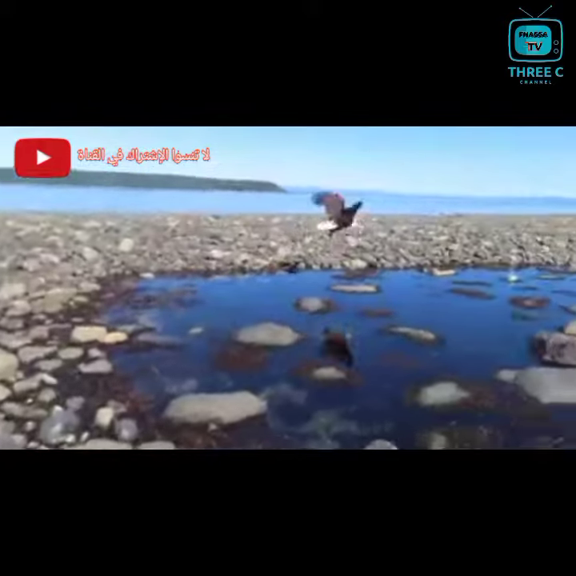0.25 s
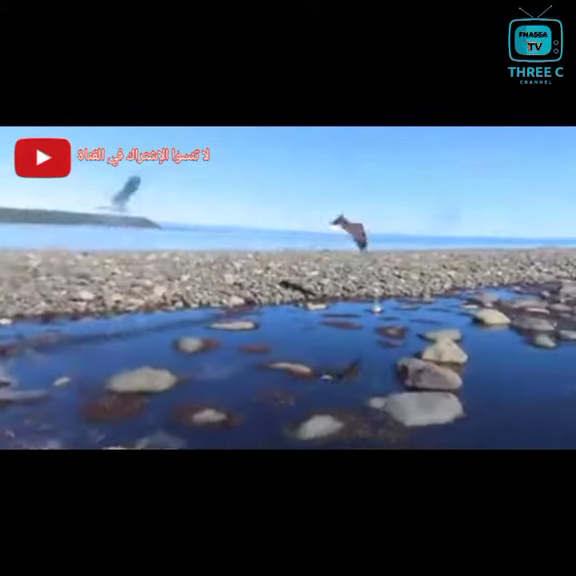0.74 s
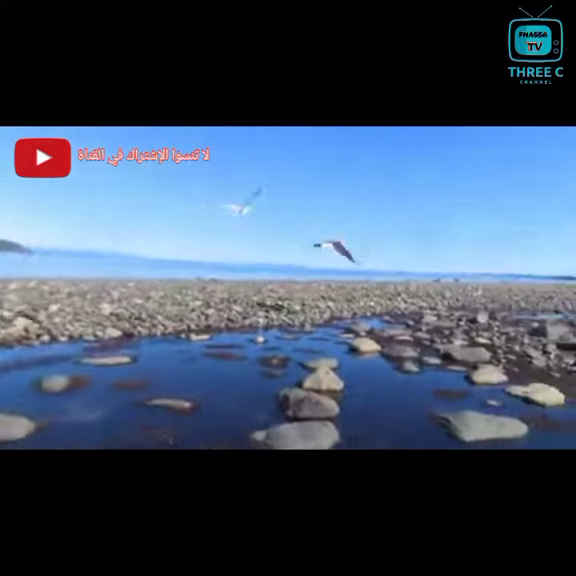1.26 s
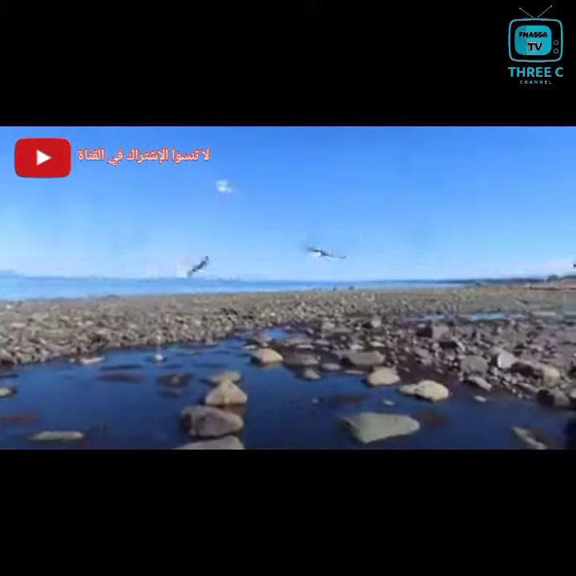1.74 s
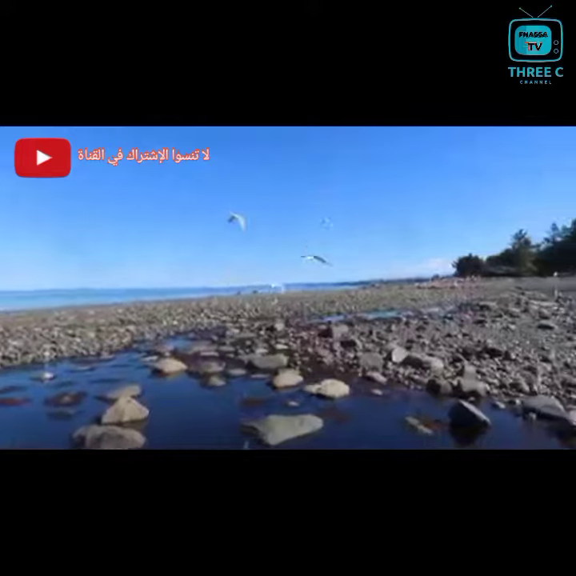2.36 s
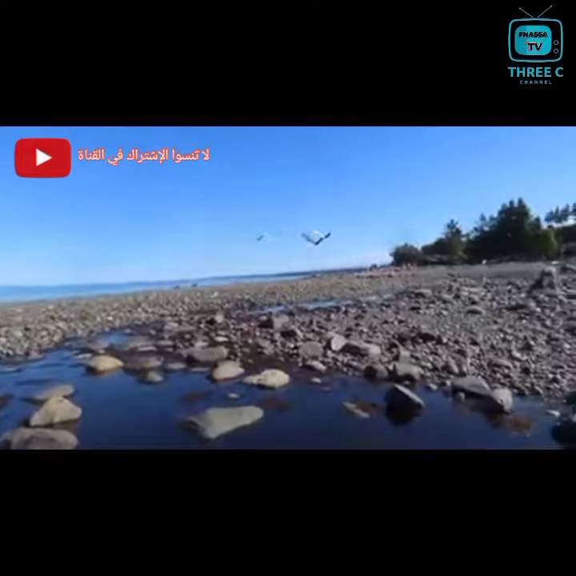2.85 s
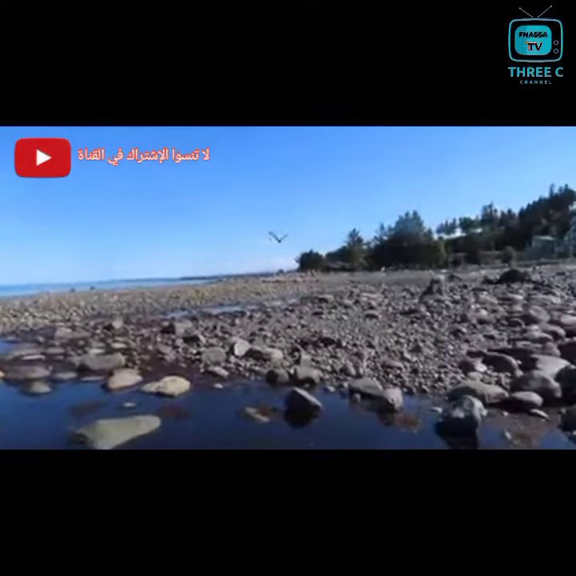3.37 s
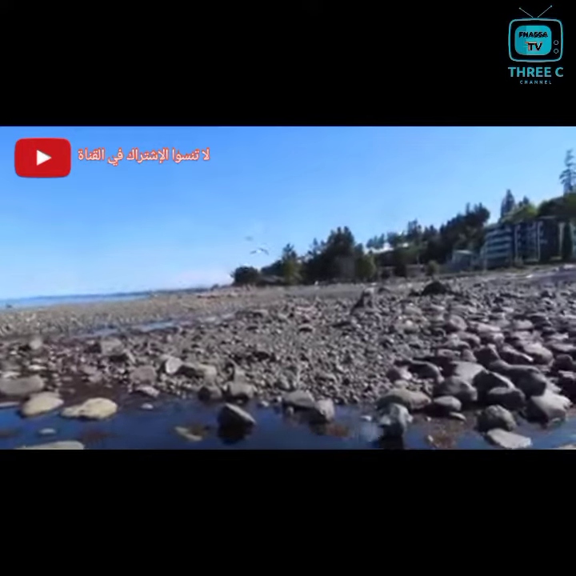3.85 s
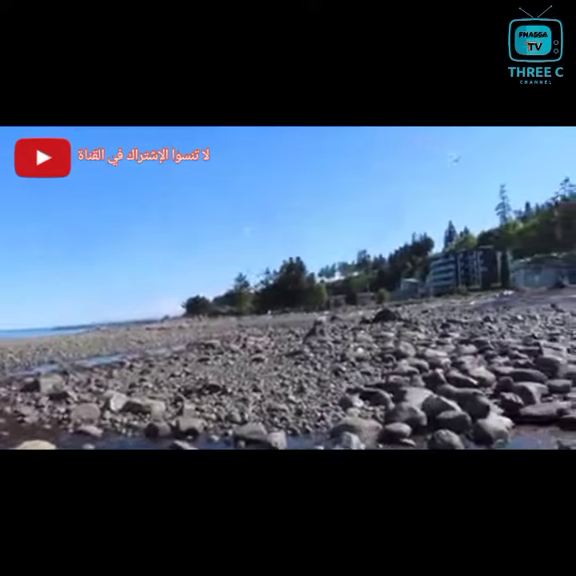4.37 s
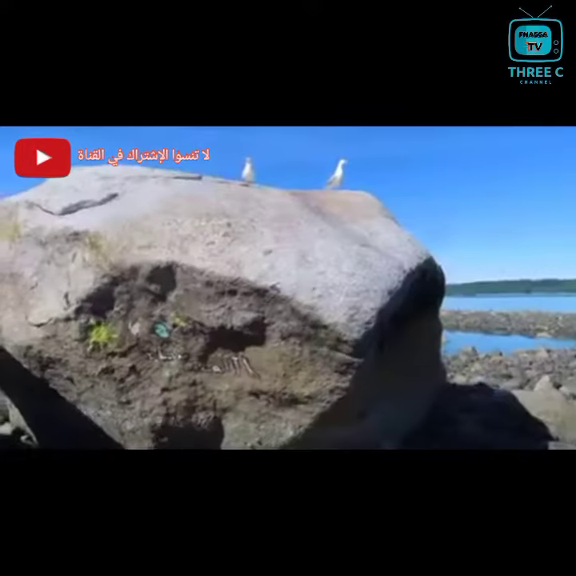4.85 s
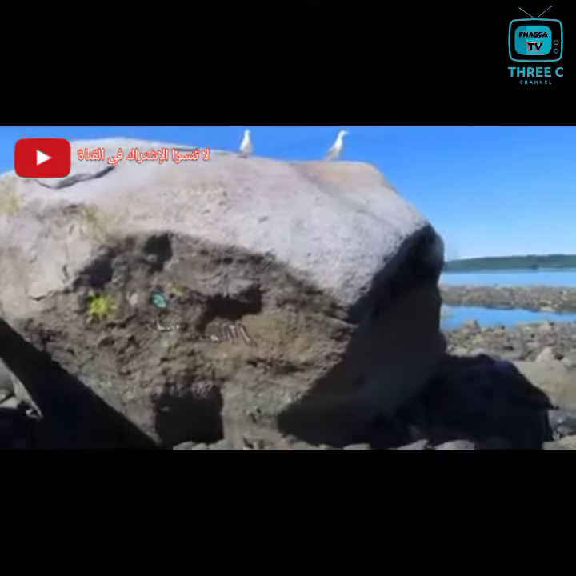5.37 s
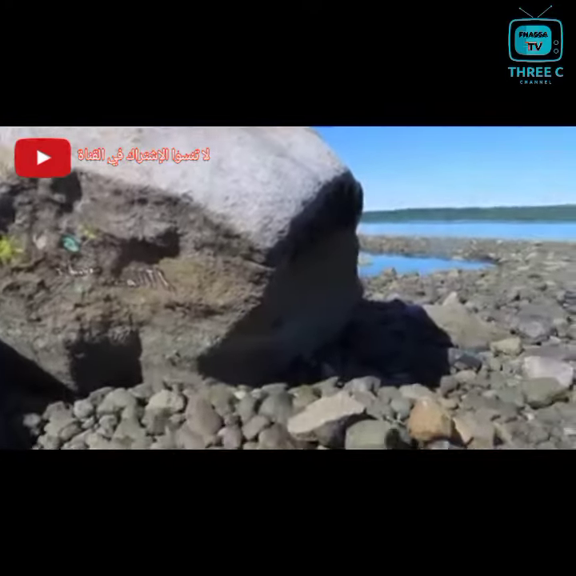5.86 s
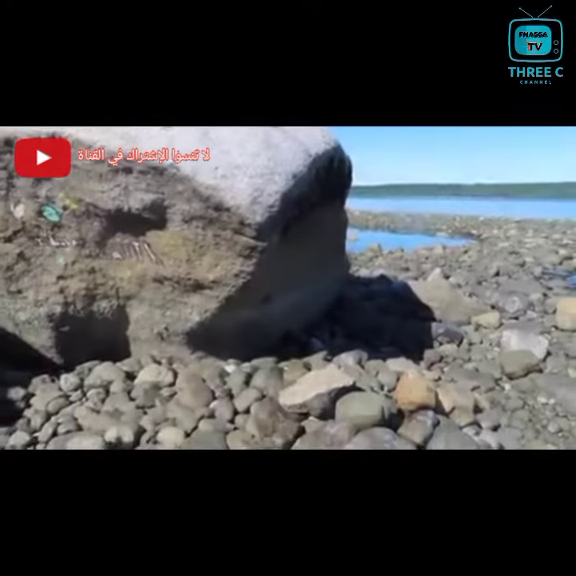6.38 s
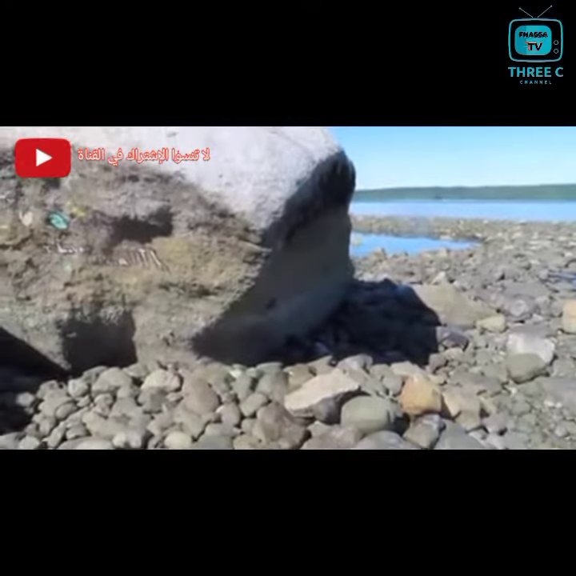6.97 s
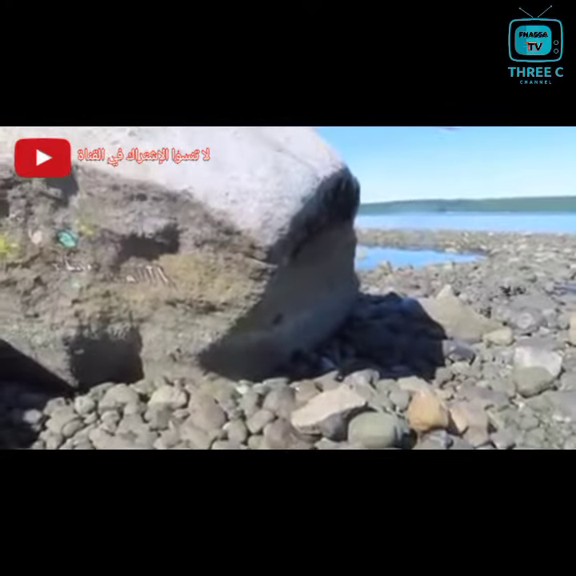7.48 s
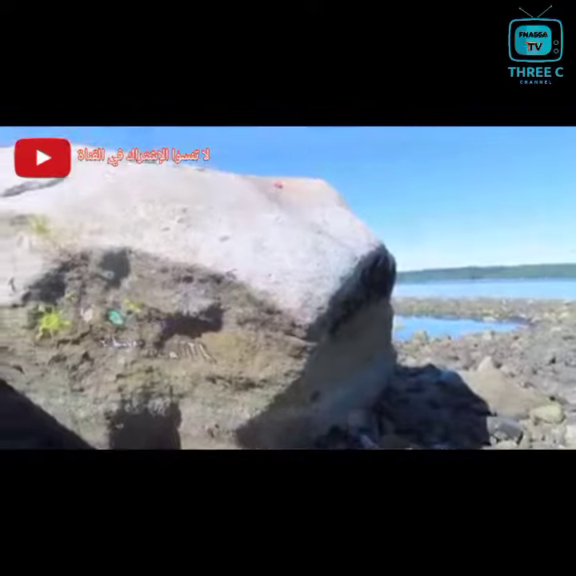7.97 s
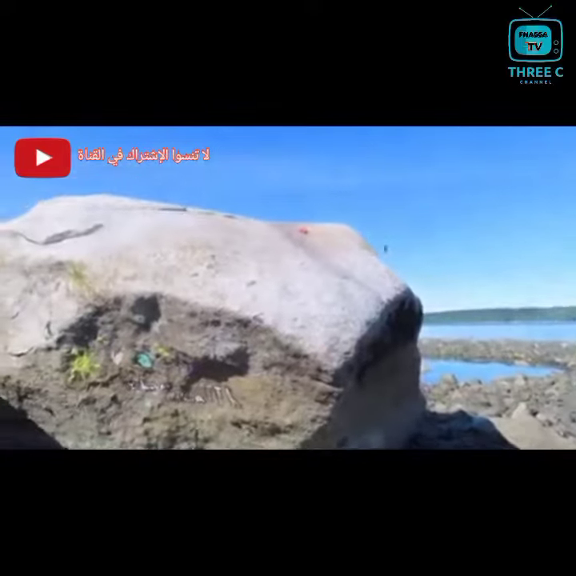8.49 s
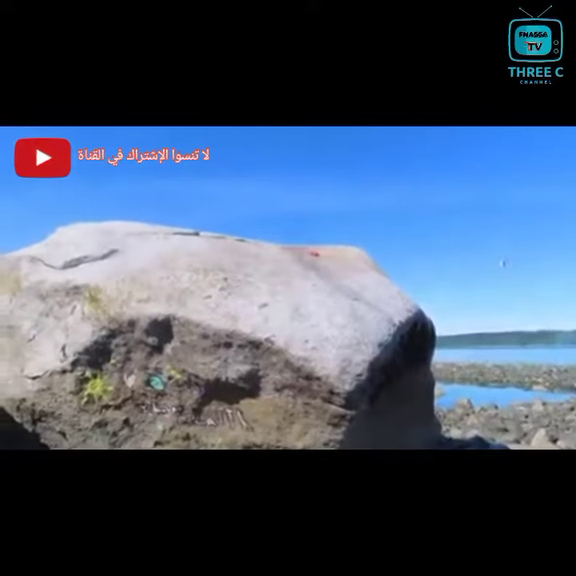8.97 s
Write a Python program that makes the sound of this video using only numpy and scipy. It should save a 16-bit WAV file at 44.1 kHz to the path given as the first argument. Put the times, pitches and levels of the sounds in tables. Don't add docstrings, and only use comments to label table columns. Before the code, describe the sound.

Harsh falling gull cries above soft sea wash and low wind rumble, cut by a short silent gap, then a far engine hum and thumping gusts.

```python
import sys
import numpy as np
from scipy import signal
from scipy.fft import rfft, irfft, next_fast_len
from scipy.io import wavfile
from scipy.ndimage import uniform_filter1d

SR = 44100
rng = np.random.default_rng(int(sys.argv[2]) if len(sys.argv) > 2 else 0)


def file_out(sig):
    cols = np.atleast_2d(sig).T
    lim = np.clip(cols, -1, 1)
    pcm = np.round(lim * 32767).astype(np.int16)
    wavfile.write(sys.argv[1], SR, pcm)


def elevation(decibels):
    levels = np.asarray(decibels, float)
    return 10 ** (levels / 20)


N = 407043
T = np.arange(N) / SR

# start_s, end_s
SHOTS = [
    (0, 4.635),
    (4.823, 8.212),
    (8.213, 9.23),
]

# frequency_hz, density_db
RUMBLE_SPECTRUM = [(20, -24.5), (40, -22), (70, -7), (110, -5.5), (160, -8), (250, -36.5)]
# frequency_hz, density_db
BUFFET_SPECTRUM = [(80, -29), (130, -6), (200, 5.5), (300, -2), (430, -10.5), (600, -23), (900, -40)]
# frequency_hz, density_db
WASH_SPECTRUM = [(240, -45.5), (400, -8), (884, -1), (1090, -3.5), (1190, -4.5), (1280, -3), (1760, -10),
                 (3310, -23.5), (5000, -30.5), (6500, -59), (11000, -120)]
# frequency_hz, density_db
SPRAY_SPECTRUM = [(2060, -17.5), (3500, -2.5), (4450, -11), (6170, -10), (12300, -22.5), (14800, -35.5),
                  (15800, -25)]
# time_s, level_db
SWELL = [
    [(0.0, -42), (0.08, -44.5), (1.45, -38), (1.5, -45.5), (2.84, -30.5), (3.44, -39), (4.04, -30.5),
     (4.62, -37.5)],
    [(4.84, -21), (5.51, -22), (6.8, -21.5), (8.03, -21.5), (8.05, -14), (8.2, -16.5)],
    [(8.23, -30.5), (9.21, -29.5), (9.23, -41)],
]
# time_s, level_db
WIND = [
    [(0, -45), (1.1, -39), (1.6, -48), (2.4, -48.5), (2.6, -28.5), (3.65, -30), (3.8, -38), (4.62, -42.5)],
    [(4.84, -26.5), (5.5, -34.5), (7.6, -36), (7.77, -29.5), (7.95, -35), (8.2, -22.5)],
    [(8.23, -32), (8.6, -38), (8.85, -20), (9.23, -23.5)],
]
# start_s, end_s, side_over_mid
WIDE_SPANS = [(2.5, 3.251, 0.18), (3.397, 3.548, 0.046), (3.952, 4.019, .12), (4.397, 4.55, 0.091),
              (4.812, 5.301, 0.22), (5.601, 5.891, 0.25), (6.2, 6.35, 0.11), (6.599, 6.899, 0.24),
              (7.047, 7.197, 0.17), (7.549, 8.248, 0.6), (8.69, 9.23, 0.2)]
# centre_s, spray_rise_db, half_length_s
WAVES = [
    (0, 17, 0.25),
    (0.332, 11.5, 0.074),
    (0.568, 13, 0.112),
    (2.88, 9, 0.16),
    (6.0, 9.5, 0.12),
    (7.357, 2, 0.15),
]
# start_s, end_s
WHINE_SPANS = [
    (4.8, 6.1),
    (8.7, 9.23),
]

# multiple, level_db
ENGINE_LINES = [(3, -34.5), (4, -26.5), (5, -21.5), (6, -50), (7, -25.5), (8, -39), (9, -33.5), (10, -41.5)]
# time_s, level_db
ENGINE_SWELL = [(4.82, -11.5), (5.6, -14), (6.5, -4.5), (7.5, 1.5), (7.8, -3), (8.2, -18.5)]

# start_s, level_db, pitch_hz
THUMPS = [(2.66, -16, 250), (2.8, -6, 154), (3.426, -10, 218), (3.614, -16, 151), (7.629, -25, 80.5),
          (7.767, -10.5, 104), (8.046, -6.5, 95.4), (8.149, -5, 79.5), (8.701, -3.5, 220)]
# start_s, level_db, pitch_hz, decay_s
PEBBLES = [(0.051, -19, 1760, 0.011), (0.422, -32.5, 2310, 0.014), (0.97, -36, 4550, 0.013),
           (4.619, -32.5, 1640, 0.014), (6.081, -42, 4860, 0.019), (6.7937, -19.5, 2190, 0.0027),
           (6.799, -27.5, 8100, 0.0031), (7.058, -46, 3970, 0.0018)]

# frequency_hz, level_db
THROAT = [(2500, 16.5), (4000, -6), (5500, -14.5), (7000, -20), (8500, -27.5), (11000, -34.5), (13000, -36),
          (16000, -50.5)]
# start_s, length_s, top_pitch_hz, end_pitch_hz, level_db
OPENINGS = [(.66, 0.083, 1385, 1413, -12.5), (2.17, 0.15, 1292, 1317, -14.5),
            (3.0, 0.053, 1090, 1110, -29.5), (3.16, .12, 1265, 1360, -24.5),
            (3.73, 0.045, 1110, 1125, -33.5), (5.255, .1, 1085, 1140, -17), (8.195, 0.11, 1305, 1315, -23),
            (8.872, 0.095, 1455, 1370, -21.5)]
# start_s, length_s, top_pitch_hz, end_pitch_hz, level_db
YELPS = [
    (6.255, .225, 1146, 800, -13),
]
# start_s, length_s, top_pitch_hz, end_pitch_hz, level_db
SHRIEKS = [
    (1.335, 0.28, 1301, 936, -12),
]
# start_s, length_s, top_pitch_hz, end_pitch_hz, level_db
WAILS = [(.7, 0.2, 1606, 1322, -15), (.965, 0.054, 1690, 1560, -25), (2.295, 0.21, 1589, 1305, -21),
         (3.265, 0.11, 1535, 1413, -23), (3.49, 0.095, 1548, 1434, -36.5), (3.762, .203, 1562, 1280, -26.5),
         (5.345, 0.1002, 1339, 1028, -16), (8.95, 0.14, 1598, 1350, -23)]
# start_s, length_s, top_pitch_hz, end_pitch_hz, level_db
DROOPS = [
    (-.085, .2, 1338, 940, -21.5),
    (1.035, .21, 1470, 1000, -25.5),
    (3.052, 0.23, 1530, 1210, -25.5),
]
# start_s, length_s, top_pitch_hz, end_pitch_hz, level_db
TAILS = [(.862, 0.077, 1277, 983, -18.5), (2.29, 0.12, 1480, 1300, -24.5), (2.369, 0.06, 1163, 927, -29),
         (3.33, 0.12, 1332, 967, -28), (3.575, .11, 1324, 1094, -34.5), (4.1, 0.079, 1290, 1170, -34),
         (4.155, 0.1, 1088, 1005, -37.5), (.1, .045, 1048, 986, -29.5), (8.285, 0.13, 1352, 877, -25.5),
         (9.07, 0.057, 1015, 1028, -33.5)]
# start_s, length_s, top_pitch_hz, end_pitch_hz, level_db
ARCHES = [
    (4.735, 0.2, 1088, 809, -16),
    (5.29, .23, 1106, 787, -15.5),
]
# notes, settings of cry(). Pitch starts a share (scoop) under the top,
# closes in over scoop_s and falls from top_share of the note on.
VOICES = [
    (OPENINGS, dict(attack_s=0.055, release_s=0.019, slope_db=3, top_share=0.084, scoop=.13, scoop_s=.018, scoop_bend=1.1, bend=1.1, half_db=3, half_s=0.052, hoarse_db=1, second_db=-7, dull_db=-4.5, third_db=-5, fall_db=-13.5)),
    (SHRIEKS, dict(attack_s=0.06, release_s=0.12, slope_db=0.5, top_share=0.45, scoop=-.145, scoop_s=.058, scoop_bend=3, bend=1.4, half_db=0, half_s=0.053, hoarse_db=3, second_db=-3, dull_db=-17, third_db=-7, fall_db=-10.5)),
    (WAILS, dict(attack_s=0.0091, release_s=0.053, slope_db=2, top_share=.01, scoop=-0.018, scoop_s=0.0093, scoop_bend=1.1, bend=1.3, half_db=-42.5, half_s=.03, hoarse_db=-10, second_db=-6.5, dull_db=-5, third_db=-17.5, fall_db=-2)),
    (DROOPS, dict(attack_s=0.01, release_s=0.061, slope_db=-4.5, top_share=.1, scoop=-0.05, scoop_s=0.026, scoop_bend=2.7, bend=2.2, half_db=-34.5, half_s=.03, hoarse_db=-21.5, second_db=-3, dull_db=-1, third_db=-11.5, fall_db=-5)),
    (TAILS, dict(attack_s=0.021, release_s=0.033, slope_db=-1.5, top_share=0.009, scoop=-0.0091, scoop_s=0.0092, scoop_bend=1.3, bend=1.05, half_db=-38, half_s=.03, hoarse_db=0.5, second_db=-9.5, dull_db=-7.5, third_db=-5, fall_db=-10)),
    (YELPS, dict(attack_s=0.084, release_s=0.09, slope_db=3, top_share=.33, scoop=.27, scoop_s=.024, scoop_bend=1.15, bend=2.5, half_db=-0.5, half_s=.035, hoarse_db=-3, second_db=0, dull_db=-17.5, third_db=-3.5, fall_db=3.5)),
    (ARCHES, dict(attack_s=0.086, release_s=0.055, slope_db=-6, top_share=.38, scoop=0.23, scoop_s=0.026, scoop_bend=1.1, bend=1.6, half_db=3.5, half_s=0.044, hoarse_db=-2, second_db=-0.5, dull_db=-15, third_db=-10, fall_db=5.5)),
]
# time_s, second_harmonic_db, higher_harmonics_db
FACING = [(0, 1, 6), (0.799, 4.5, 2), (1.1, -3, 2.5), (1.45, 2.5, 2), (2.201, -5.5, -4.5), (2.4, 5, -9),
          (3.1, 2.5, -16), (3.25, 0.5, -6.5), (3.599, -3, -3), (3.85, 3.5, -15), (4.2, -5.5, 9.5),
          (4.85, -1.5, 1.5), (5.3, -4, 1), (6.3, -1, -3), (8.3, 6, -2.5), (9.001, -2, -5.5)]

# frequency_hz, phase_rad
PORT_PHASE = [
    [(500, 0), (1200, .1), (2500, 0.17), (4300, 0.7), (6600, 2.0), (8000, 2), (9000, .1)],
    [(700, 0), (2000, -0.053), (4000, -.1), (9000, .01)],
]
# frequency_hz, level_db
LEFT_SHADE = [(800, 0), (1400, -2), (3000, -5), (5000, -5), (9000, 0)]


def shape(hz, points):
    f, value = np.transpose(points)
    return np.interp(np.log(np.maximum(hz, 1)), np.log(f), value)


def colour(x, gain):
    size = next_fast_len(x.shape[-1] + 2048)
    spectrum = rfft(x, size) * gain(np.fft.rfftfreq(size, 1 / SR))
    return irfft(spectrum, size)[..., :x.shape[-1]]


def walk(rate, count=N):
    hold = int(SR / rate)
    steps = np.repeat(rng.standard_normal(count // hold + 1), hold)
    return 1.58 * uniform_filter1d(uniform_filter1d(steps, hold), hold)[:count]


def by_shot(values):
    shot = np.searchsorted([SHOTS[1][0], SHOTS[2][0]], T)
    return uniform_filter1d(np.asarray(values, float)[shot], size=300)


def noise(points, apart, swell_db, flicker_db, flicker_rate):
    out, gust = 0, walk(6)
    low, high = points[0][0], points[-1][0]
    for hz in low * 2. ** np.arange(np.log2(high / low) + 1):
        def band(f):
            return elevation(shape(f, points)) * np.clip(1 - abs(np.log2((f + 1) / hz)), 0, 1) ** .5
        mid, side = colour(rng.standard_normal((2, N)), band)
        level_db = swell_db * (0.42 * walk(0.53) + gust) + flicker_db * walk(flicker_rate)
        out = out + elevation(level_db) * (mid + apart * side * np.array([[1], [-1]]))
    return out / np.std(out)


def insect_whine():
    on = sum((T > start) * (T < end) for start, end in WHINE_SPANS)
    phase = 2 * np.pi * np.cumsum(4550 + 40 * walk(60)) / SR
    return on * elevation(-66 + 5 * walk(25)) * np.sin(phase)


def sea_and_wind():
    edges = [side * np.clip(np.minimum(T - start, end - T) / .025, 0, 1) for start, end, side in WIDE_SPANS]
    apart = sum(edges) * elevation(2.5 * walk(12))
    swell_db, wind_db = (np.interp(T, *np.concatenate(tables).T) for tables in (SWELL, WIND))
    waves_db = sum(rise * np.exp(-((T - centre) / half) ** 2) for centre, rise, half in WAVES)
    wash_db = by_shot([-42.5, -40.5, -41]) + 0.084 * waves_db
    spray_db = by_shot([-60.5, -60, -61]) + waves_db
    rumble = noise(RUMBLE_SPECTRUM, 0.5 * apart, 1.6, 2.5, 5.5)
    buffet = noise(BUFFET_SPECTRUM, apart, 1.96, 3.04, 25)
    wash = noise(WASH_SPECTRUM, 0.02, 1.0, 1.0, 14)
    spray = noise(SPRAY_SPECTRUM, 0.52, 0.71, 0.56, 12)
    return rumble * elevation(swell_db) + buffet * elevation(wind_db) + wash * elevation(wash_db) + spray * elevation(spray_db)


def boat_engine():
    phase = 2 * np.pi * np.cumsum(18.05 * (1 + 0.00514 * walk(1.386))) / SR
    hum = 0
    for multiple, db in ENGINE_LINES:
        hum = hum + elevation(db + 3.5 * walk(2.958)) * np.sin(multiple * phase + 6 * rng.random())
    start, end = SHOTS[1]
    heard = (T > start) * np.clip((end - T) / 0.0046, 0, 1)
    return np.sqrt(2) * hum * elevation(np.interp(T, *np.transpose(ENGINE_SWELL))) * heard


def gust_thumps():
    out = np.zeros((2, N))
    for start, db, hz in THUMPS:
        age = np.maximum(T - start, 0)
        out += elevation(db) * np.sin(2 * np.pi * hz * age) * np.exp(-age * hz / 1.18) * np.minimum(age * hz, 1)
    return out


def pebble_clicks():
    out = np.zeros((2, N))
    t = T[:SR // 10]
    for start, db, hz, decay_s in PEBBLES:
        a = int(start * SR)
        raw = rng.standard_normal(len(t)) + 0.53 * rng.standard_normal((2, len(t)))
        burst = colour(raw, lambda f: 1 / (1 + (decay_s * 250 * np.log2((f + 1) / hz)) ** 2))
        envelope = np.exp(-t / decay_s) * np.clip(t / 0.00026, 0, 1)
        out[:, a:a + len(t)] += elevation(db) * burst / burst.std() * envelope
    return out


def cry(start, length, top_hz, end_hz, level_db, attack_s, release_s, slope_db, top_share, scoop, scoop_s,
        scoop_bend, bend, half_db, half_s, hoarse_db, second_db, dull_db, third_db, fall_db):
    a, b = max(int(start * SR), 0), min(int((start + length) * SR), N)
    t = T[a:b]
    age, left = t - start, start + length - t
    share = age / length

    approach = top_hz * scoop * np.exp(-(abs(age) / scoop_s) ** scoop_bend)
    fall = (top_hz - end_hz) * np.clip((share - top_share) / (1 - top_share), 0, 1) ** bend
    hz = top_hz - approach - fall
    rasp = elevation(min(hoarse_db, 10)) * (np.exp(-(age / .025) ** 2) + .3 * np.exp(-left / .02)) + .1
    jitter = 0.0062 * walk(90.0, count=b - a) + .009 * (rasp - .1) * walk(400, count=b - a)
    phase = 2 * np.pi * np.cumsum(hz * (1 + jitter)) / SR

    edges = np.clip(1 - age / attack_s, 0, 1) ** 2 + np.clip(1 - left / release_s, 0, 1) ** 2
    first = level_db + slope_db * (share - .5) - 24 * edges
    when, *facing = np.transpose(FACING)
    second, higher = (np.interp(t, when, column) for column in facing)
    levels = [first, first + second_db + dull_db * share + second]
    for k in range(3, 14):
        octaves = np.log2(k / 3)
        throat = shape(k * hz, THROAT) - shape(3 * hz, THROAT)
        levels.append(levels[1] + higher * (1 + .6 * octaves) + third_db + fall_db * octaves + throat)

    out = np.zeros(b - a)
    for k, db in enumerate(levels, 1):
        half = elevation(half_db - (18 if k == 1 else 0)) * np.exp(-(age / half_s) ** 2) * np.sin((k - .5) * phase)
        rough = (rasp + 0.041 * elevation(-.5 * higher) * (k - 1)) * walk(600, count=b - a)
        wobble = 1 + rough + 0.26 * k ** 0.55 * walk(50.56, count=b - a)
        out += np.sqrt(2) * elevation(db) * (k * hz < 17000) * wobble * (np.sin(k * phase + k * k) + half)
    return np.pad(out * np.clip(np.minimum(age, left) / .006, 0, 1), (a, N - b))


def echoes(birds):
    t = T[:SR // 2]
    rocks = elevation(-41) * np.exp(-np.log(1000) * t / .14)
    trees = elevation(-52) * np.exp(-np.log(1000) * t / .7)
    mid, side = rng.standard_normal((2, len(t))) * (rocks + trees) * np.clip(t / 0.0027, 0, 1)
    scatter = mid + .3 * side * np.array([[1], [-1]])
    echo = signal.fftconvolve(birds[None], scatter, axes=1)[:, :N]
    tone = [(900, -25.5), (1500, -5.0), (2300, -14), (3200, 6.0), (3600, -4.5), (4600, 2), (9000, 3.0)]  # Hz, dB
    return colour(echo, lambda f: elevation(shape(f, tone)))


def gulls():
    birds = sum(cry(*note, **voice) for notes, voice in VOICES for note in notes)
    return birds + echoes(birds)


def duck(birds):
    knee_db, power, recover_s = -16.5, 0.89, 0.53
    keep = np.exp(-1 / (recover_s * SR))
    loud = signal.lfilter([1 - keep], [1, -keep], abs(birds).mean(0))
    return np.where(T < SHOTS[0][1], (1 + loud / elevation(knee_db)) ** -power, 1)


def scene():
    birds = gulls()
    shore = insect_whine() + sea_and_wind()
    return duck(birds) * shore + boat_engine() + gust_thumps() + pebble_clicks() + birds


def low_pass(x):
    return signal.sosfilt(signal.butter(12, 16050, fs=SR, output="sos"), x)


def record(dry):
    turned = []
    for ports in PORT_PHASE:
        turned.append([colour(channel, lambda f: np.exp(.5j * sign * shape(f, ports)))
                       for channel, sign in zip(dry, (1, -1))])
    aside, ahead = turned
    aside[0] = colour(aside[0], lambda f: elevation(shape(f, LEFT_SHADE)))
    swing = np.clip((T - 1.5) / .6, 0, 1)
    x = (1 - swing) * aside + swing * ahead
    x = colour(x, lambda f: 1 / (1 + (f / 15600) ** 60))
    gap = np.clip(np.maximum((SHOTS[0][1] - T) / 0.0092, (T - SHOTS[1][0]) / 0.00042), 0, 1)
    limited = x / (1 + x ** 8) ** (1 / 8)
    return low_pass(limited * gap)


dry = scene()
out = record(dry)
file_out(out)
```